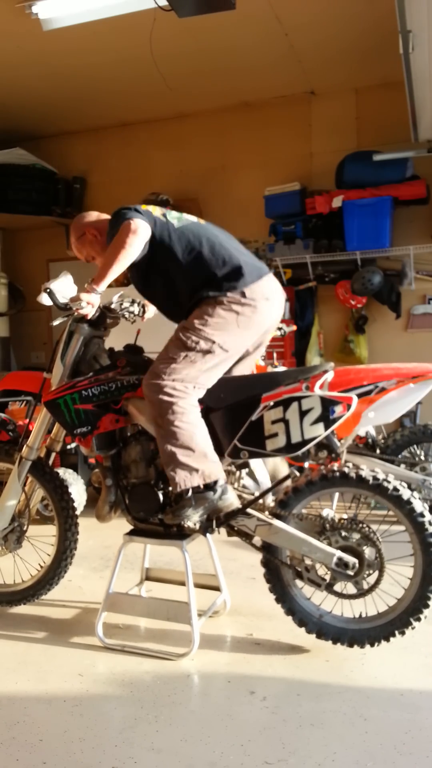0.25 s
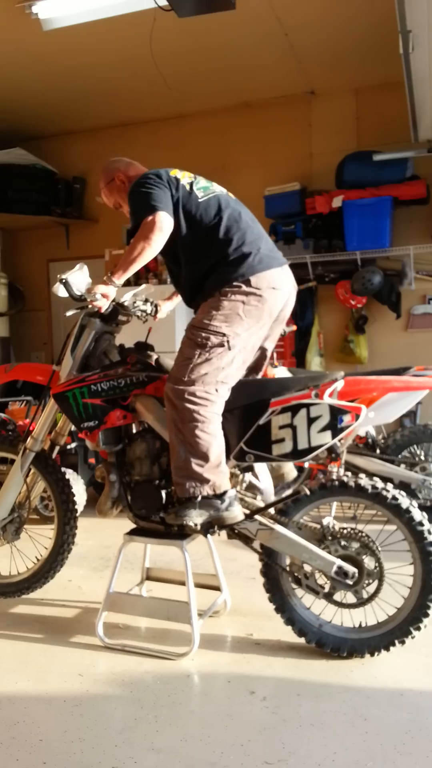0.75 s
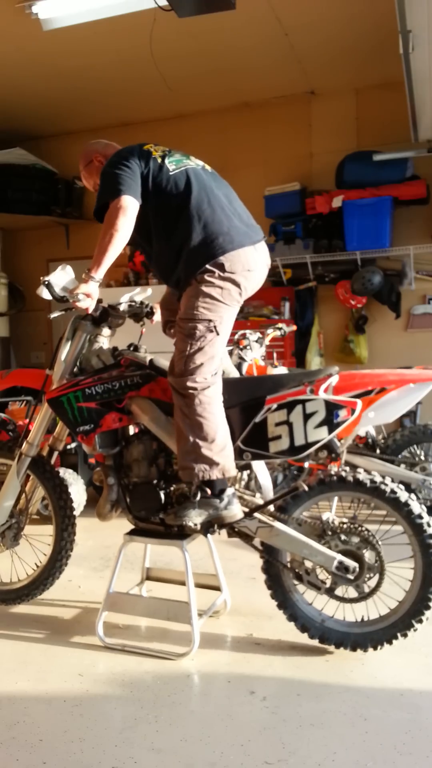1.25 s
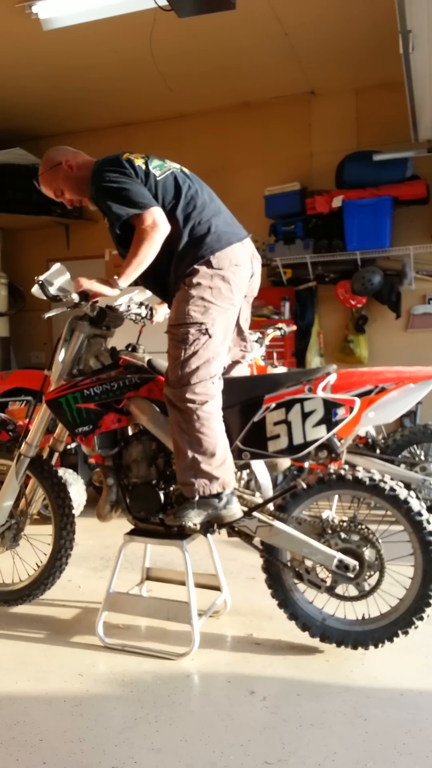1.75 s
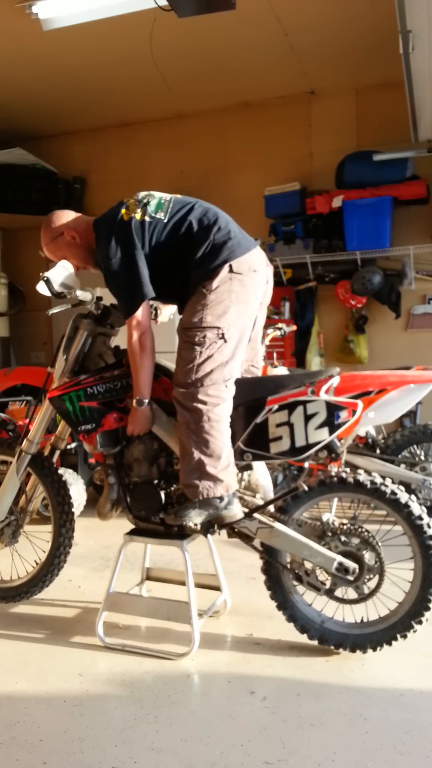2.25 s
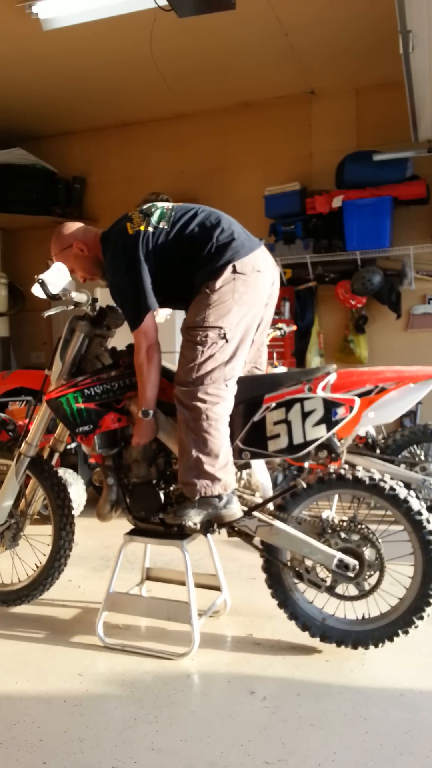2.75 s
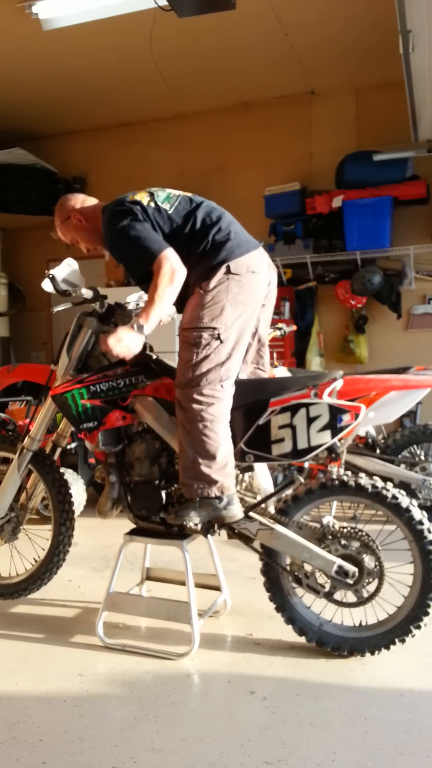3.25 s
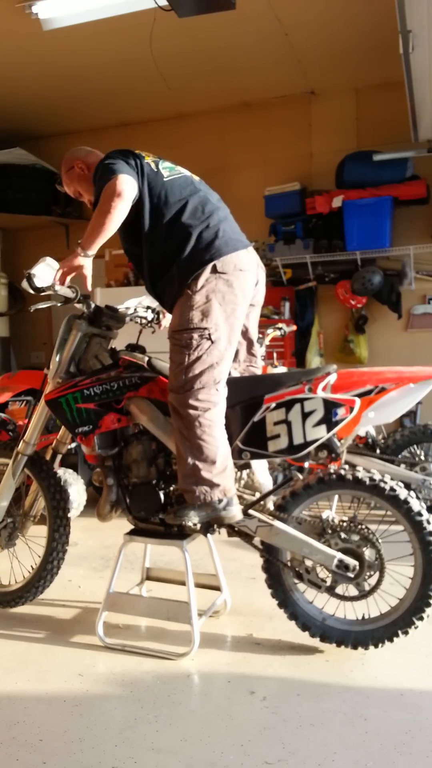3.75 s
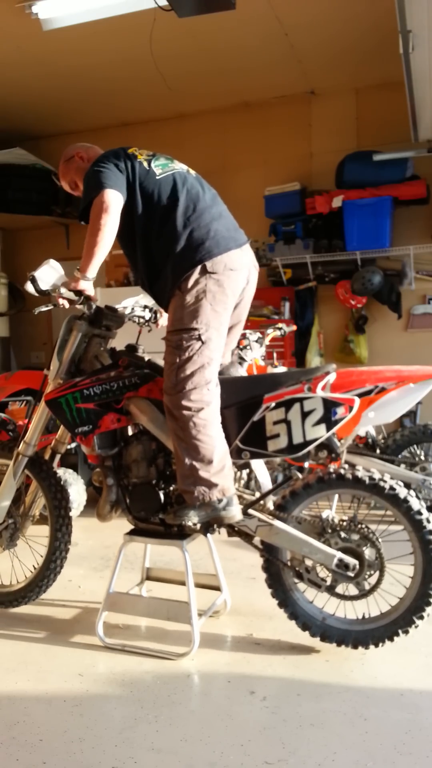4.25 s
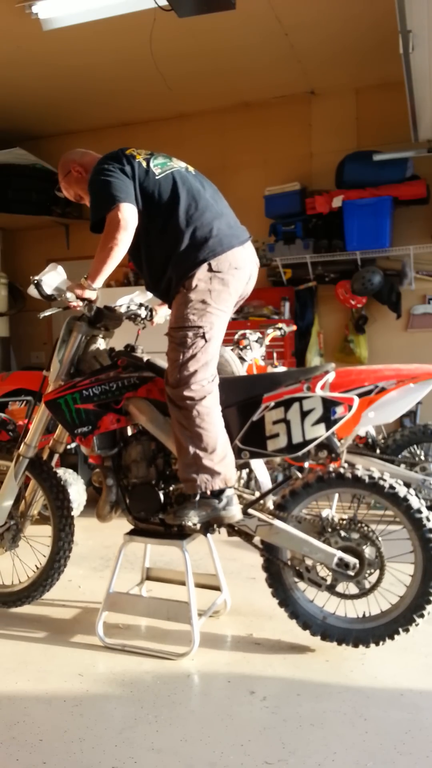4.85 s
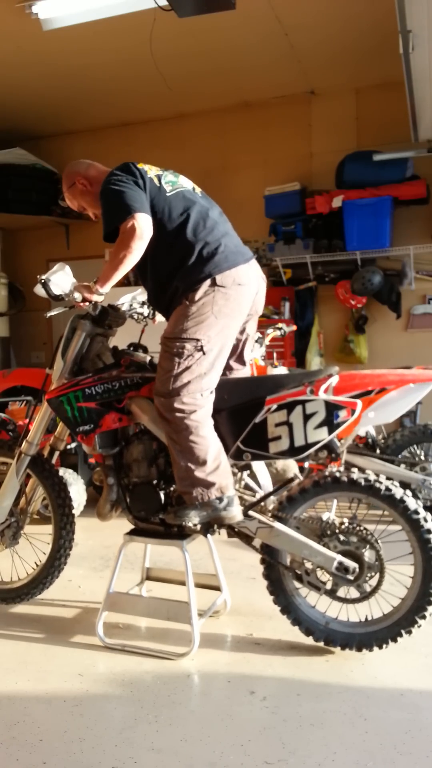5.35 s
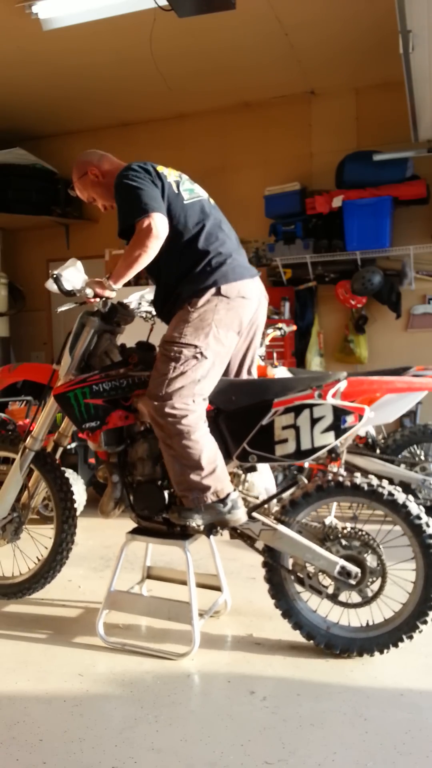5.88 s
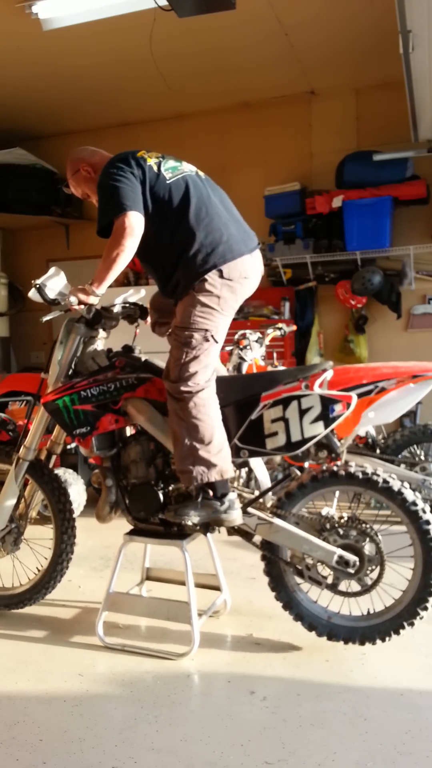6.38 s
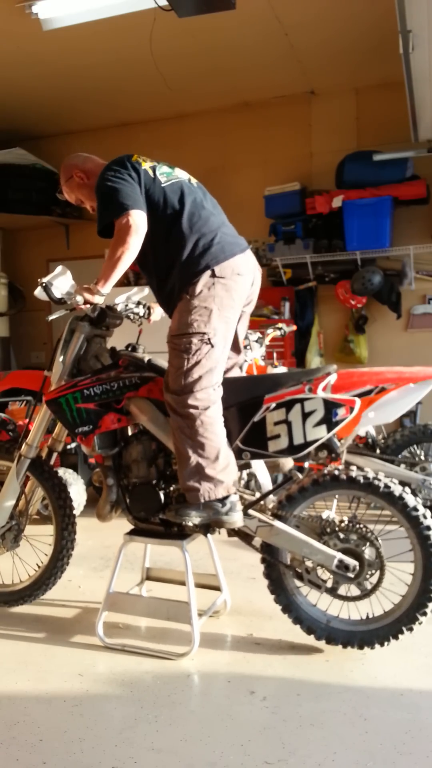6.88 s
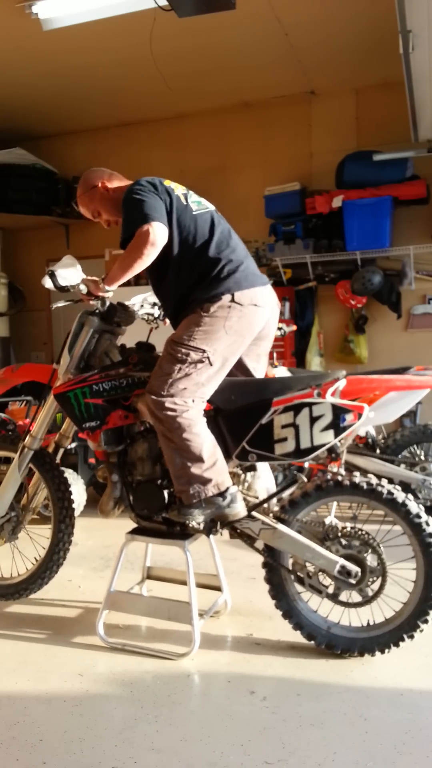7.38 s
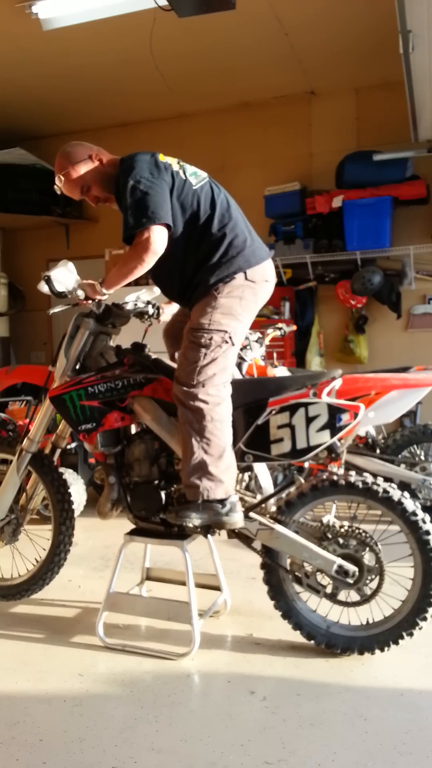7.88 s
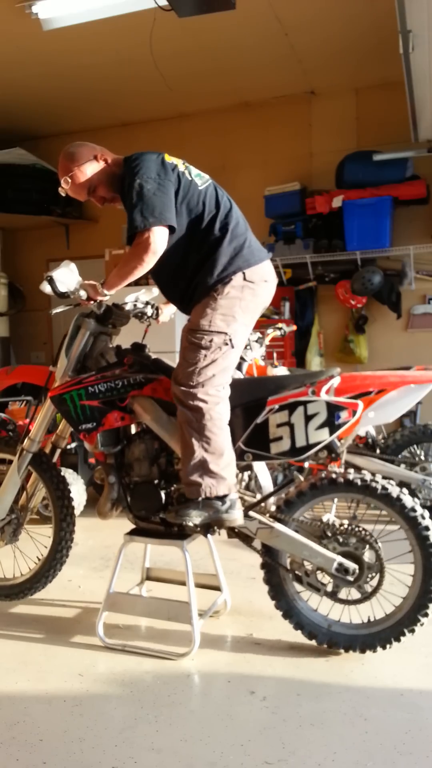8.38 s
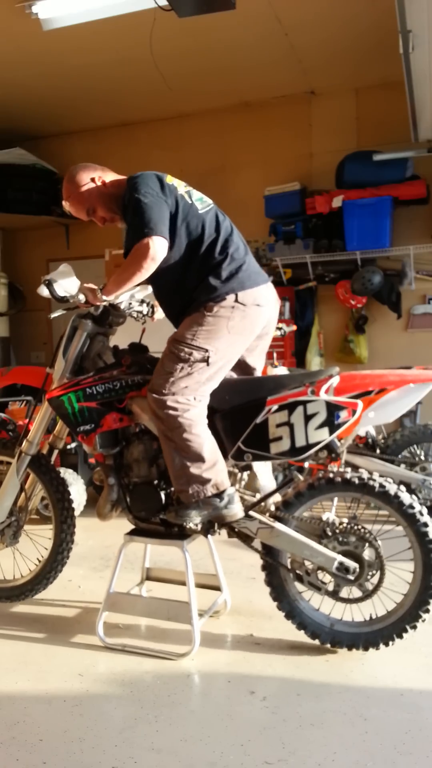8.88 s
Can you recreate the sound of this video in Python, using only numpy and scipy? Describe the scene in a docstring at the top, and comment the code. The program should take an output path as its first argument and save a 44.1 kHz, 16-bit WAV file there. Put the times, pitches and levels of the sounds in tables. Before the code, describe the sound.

In a garage, a kick starter is stamped on a dirt bike propped on a steel stand. A violent cluster of clanks and hollow thuds comes first, then scattered lighter clicks and taps during a quieter fiddling pause. A breathy hiss leads into renewed kicking, with busy clanks, gritty gear rattle, pipe knocks and short whistling air leaks. The engine never fires. Close stereo microphone, short room reverberation, very faint background.

```python
"""A two-stroke dirt bike's kick starter clanks on a steel stand in a garage; the engine never catches.
Blows of lever, ratchet and stand are noise bursts with ringing steel; the starter gears rattle as gritty noise.
Air breathes through the pipe's resonances amid hollow knocks and puffs and low thumps, all decaying tones.
Air hisses out as noise with a whistling band; the pivot chirps once as a stack of overtones.
The garage answers with decaying noise tails over a faint floor; two spaced microphone ports listen."""
import sys
import numpy as np
from scipy import signal
from scipy.fft import rfft, irfft, next_fast_len
from scipy.io import wavfile
from scipy.ndimage import uniform_filter1d, minimum_filter1d, map_coordinates

SR = 44100
rng = np.random.default_rng(int(sys.argv[2]) if len(sys.argv) > 2 else 0)


def dump_mix(stems):
    """Bounce the given channels to the path in sys.argv[1] as a 16-bit WAV at rate SR."""
    frames = np.atleast_2d(stems).T  # one column per channel
    limited = np.clip(frames, -1, 1)  # hard clip at full scale
    pcm = np.round(limited * 32767).astype(np.int16)
    wavfile.write(sys.argv[1], SR, pcm)


N = 402633
TIME = np.arange(N) / SR  # s
CURVE_STEP = 64  # samples between the points of a spell's gain curve


def amp(db):
    """dB to gain."""
    return 10 ** (np.asarray(db) / 20)


def unit(x):
    """Scale to rms 1."""
    return x / np.sqrt(np.mean(x ** 2) + 1e-20)


def along(points, hz):
    """Read (f/Hz, value) points on a log frequency axis."""
    f, value = np.transpose(points)
    return np.interp(np.log(hz + 1), np.log(f + 1), value)


def curves(rows):
    """One value per sample for each column after the time."""
    s, *columns = np.transpose(rows)
    return [np.interp(TIME, s, column) for column in columns]


def wobble(rate):
    """A smooth random curve with rate knots a second."""
    knots = rng.standard_normal(int(N * rate / SR) + 4)
    return map_coordinates(knots, [TIME * rate])


def filtered(x, response):
    """x times a complex response of frequency."""
    n = x.shape[-1]
    padded = next_fast_len(n + SR // 4)
    spectrum = rfft(x, padded) * response(np.fft.rfftfreq(padded, 1 / SR))
    return irfft(spectrum, padded)[..., :n]


def coloured(x, spectrum):
    """Causal filter with the given spectrum, falling steeply below it, that keeps the power of white noise."""
    size = 2 ** 12
    lowest_hz, lowest_db = spectrum[0]
    skirt = [(lowest_hz / 3, lowest_db - 40)]
    gain = amp(along(skirt + spectrum, np.fft.rfftfreq(size, 1 / SR)))
    # folding the cepstrum onto positive times makes the filter minimum-phase
    cepstrum = irfft(np.log(gain + 1e-4))
    cepstrum[1:size // 2] *= 2
    cepstrum[size // 2 + 1:] = 0
    impulse = irfft(np.exp(rfft(cepstrum)))
    return signal.fftconvolve(x, impulse / np.linalg.norm(impulse))[:N]


def resonant(x, modes):
    """x through parallel (f/Hz, width/Hz, level/dB) resonances of alternating sign."""
    def response(f):
        total = 0
        for k, (centre, width, db) in enumerate(modes):
            damping = 1j * f * width
            total = total + (-1) ** k * amp(db) * damping / (centre * centre - f * f + damping)
        return total
    return filtered(x, response)


def gritty(rate, spread_db, grit):
    """Steady noise mixed with sparse bursts, rate a second; grit is the bursts' share of the power."""
    sizes = amp(spread_db * np.minimum(rng.exponential(size=N), 3.5))
    ticks = (rng.random(N) < rate / SR) * sizes
    burst_decay = amp(-60 * TIME[:SR // 20] / 0.015)
    bursts = signal.fftconvolve(ticks, burst_decay)[:N] * rng.standard_normal(N)
    grit = np.clip(grit, 0, 1)
    return np.sqrt(grit) * unit(bursts) + np.sqrt(1 - grit) * rng.standard_normal(N)


def spells(rows, rise_s, fall_db_per_s):
    """Each row swells, slides from its first to its last level, then dies away; one gain curve per row."""
    start, length, first_db, last_db = np.transpose(rows)[:4, :, None]
    t = TIME[::CURVE_STEP] - start
    slide = (last_db - first_db) * np.clip(t / length, 0, 1)
    fall = fall_db_per_s * np.maximum(t - length, 0)
    return amp(first_db + slide - fall) * np.clip(1 + t / rise_s, 0, 1) ** 2


def summed(gains, rest_db):
    """Gain curves add as powers over a resting level."""
    power = (gains ** 2).sum(axis=0) + amp(2 * rest_db)
    return np.interp(TIME, TIME[::CURVE_STEP], np.sqrt(power))


# likeness of left and right in diffuse sound: (f/Hz, correlation)
LIKENESS = [(30, .88), (80, .93), (200, .85), (400, .75), (900, -.05), (2400, .1), (6000, .01),
            (15000, -.17)]


def pair(noise):
    """Two noises become left and right, alike in the bass and nearly unrelated in the treble."""
    def shares(hz):
        angle = np.arccos(np.clip(along(LIKENESS, hz), -1, 1)) / 2
        return np.array([np.cos(angle), np.sin(angle)])
    mid, side = filtered(noise, shares)
    return np.array([mid + side, mid - side])


# spectrum of the faint floor: (f/Hz, relative level/dB)
FLOOR_COLOUR = [(15, -35), (25, 7), (132, 10), (349, -11), (613, -2), (803, -3.5), (3160, -15), (4370, -5),
                (13500, -7), (15500, -66.5)]
FLOOR_DB = -62  # level ahead of the ports


def quiet_floor():
    """Steady coloured noise lies under everything in both ports."""
    noises = [coloured(noise, FLOOR_COLOUR) for noise in rng.standard_normal((2, N))]
    return amp(FLOOR_DB) * pair(np.array(noises))


# clanks of lever, ratchet and stand; knock and brightness relative to the body, levels before the mix:
# (t/s, level/dB, knock/dB, brightness/dB, t60/s)
BLOWS = [(.004, -13.5, -5, -12.5, 0.053), (.3232, -23, -5, 1, 0.059), (0.3545, -6, -2, -9, 0.061),
         (0.4136, -9.5, -8, -8.5, 0.086), (.4566, -9, -3.5, -34, 0.073), (0.5004, -2, -5, -20, 0.026),
         (0.7681, -15.5, -2, -31, 0.046), (0.8389, -20, -4, -28, 0.055), (0.8885, -12.5, -17.5, -4, 0.085),
         (1.2405, -33.5, 4.5, -35, .089), (1.2937, -11, -22, -7.5, 0.084), (1.3934, -17, -15, -29, 0.052),
         (1.6568, -41.5, 2, -6.5, 0.6), (1.787, -30, 0.5, -37, 0.053), (1.9036, -21, -13, -39, 0.046),
         (2.059, -39, 5.5, -21, 0.028), (2.2403, -13.5, -10, -9, 0.054), (2.4251, -15.5, -19, -4, 0.051),
         (2.704, -25, -15, -9, 0.12), (2.932, -41.5, -4, -22, 0.3), (2.9714, -22, -21, -29, 0.34),
         (3.261, -33, -15, -8, 0.069), (3.3132, -19, -21, -10, 0.082), (3.3406, -10, -16, -9.5, .047),
         (3.443, -10, -18, -4, 0.042), (3.624, -29, -6, -22, 0.095), (3.646, -14.5, -23, -7, .11),
         (3.84, -28, -13, -7, 0.054), (4.1663, -21, -24, -8, 0.077), (4.1934, -22, -16, -5, 0.16),
         (4.6391, -20, -14.5, -15, 0.046), (4.777, -21, 2, -40, 0.033), (4.9484, -31.5, 12.5, -38, 0.035),
         (5.5031, -8.5, -14.5, -21, 0.041), (5.6738, -10, -0.5, -25, .04), (5.7491, -13, -7, -27, .093),
         (5.7996, -18, -29, -8, 0.41), (5.916, -16.5, -3, -8, 0.082), (5.9937, -25.5, -12, -14.5, 0.6),
         (6.1238, -17, -8.5, -9, 0.089), (6.2098, -18.5, -13, -5.5, 0.12), (6.3764, -24.5, -2, -33, 0.17),
         (6.572, -16.5, 2.5, -41.5, 0.024), (6.7007, -25.5, -13, 4, 0.093), (6.8005, -16.5, -5.5, 1, 0.06),
         (6.935, -26.5, 4.5, -20, 0.072), (7.0751, -20.5, 3.5, -28, 0.034), (7.3654, -13, -8.5, -4, 0.058),
         (7.5393, -8.5, -12, -7.5, 0.057), (7.658, -15, -8.5, -4, 0.043), (7.7572, -20, -7, -10, 0.18),
         (7.8306, -12, -14, -18, 0.035), (7.874, -15, -15, -12, 0.046), (7.9175, -15, -34, -11, 0.04),
         (8.2536, -16, -1.5, -20, 0.12), (8.3433, -17.5, 1, -34, 0.054), (8.451, -11.5, -10.5, -9, 0.05),
         (8.4896, -10, -17, -5.5, 0.043), (8.556, -21.5, -12, -1, 0.062), (8.6084, -22.5, -16, -14.5, 0.12),
         (9.0483, -7.5, -8, -25, 0.052), (9.075, -8, -12.5, -18, 0.055)]
# spectra of metal noise, duller knock and bright fizz: (f/Hz, relative level/dB)
METAL_COLOUR = [(710, -35), (1200, -10), (1400, -13.5), (1890, -3.5), (2560, -5.5), (3140, -1.5),
                (3620, -3), (4430, 3), (5760, -0.5), (7170, 0.5), (9000, -19), (11700, -23), (19800, -120)]
KNOCK_COLOUR = [(180, -18), (300, -4), (687, -6), (833, -6), (1110, -2), (1370, -7.5), (1530, -2),
                (3000, -9), (3900, -63), (6600, -120)]
FIZZ_COLOUR = [(3530, -25), (6000, 12), (7170, 15.5), (13900, 1.5), (15000, -17), (15500, -103)]
# resonances of lever and stand: (f/Hz, width/Hz, level/dB)
STEEL_MODES = [(2124, 87, 6.5), (3000, 260, -4), (3070, 50, -7), (3344, 120, 11.5), (4050, 46, -22),
               (4970, 114, -8.5), (5220, 87, 13.5), (5604, 23.5, -6), (5960, 273, 14), (7030, 24, -45),
               (6830, 21.5, -16.5), (7200, 77, -14)]
CLANK_RISE_S = 0.0015
SCRAPE_DB, SCRAPE_T60_S = -17.5, 0.051  # the parts graze just before each blow


def clanks():
    """Each contact is a blow and a shudder: metal noise, a duller knock, fizz and the ring of the steel."""
    force, ring = np.zeros((3, N + SR)), np.zeros(N + SR)
    t = TIME[:SR // 3]
    onset = 1 - np.exp(-(t + 1 / SR) / CLANK_RISE_S)
    for s, db, knock_db, bright_db, t60 in BLOWS:
        at = round(s * SR)
        shudder = onset * amp(db - 60 * t / max(t60, .01))
        blow = amp(db - 3.5 - 60 * t / 0.014)
        burst = (shudder + blow) * rng.standard_normal((3, len(t)))
        force[:, at:at + len(t)] += burst * amp([[0], [knock_db], [bright_db]])
        # reversed decay: the graze grows up to the blow
        graze = amp(db + SCRAPE_DB - 60 * t[:min(at, 2000)][::-1] / SCRAPE_T60_S)
        force[0, at - len(graze):at] += graze * rng.standard_normal(len(graze))
        for hz, width, level in STEEL_MODES:
            pitch = hz * rng.normal(1, 0.014)
            tone = np.sin(2 * np.pi * pitch * t) * np.exp(-np.pi * abs(width) * t)
            ring[at:at + len(t)] += amp(db + level - 17.0 + rng.normal(0, 1.72)) * onset * tone
    colours = (METAL_COLOUR, KNOCK_COLOUR, FIZZ_COLOUR)
    noise = sum(coloured(f, colour) for f, colour in zip(force, colours))
    return amp(-1.0) * noise + ring[:N]


# how long the garage holds each frequency: (f/Hz, t60/s)
GARAGE_T60 = [(100, 0.43), (400, 0.47), (1000, 0.43), (3000, 0.4), (7000, 0.35), (14000, 0.2)]


def garage(x, size=SR // 3):
    """Each frequency dies at its own speed; the parts sound from shifting places, so the answer keeps changing."""
    hop = size // 2
    out, x = np.zeros((2, N + 2 * SR)), np.pad(x, (hop, size))
    fade = np.sin(np.pi * np.arange(size) / size)  # overlapping pieces keep their summed power
    for at in range(0, N + hop, hop):
        hz, t, z = signal.stft(rng.standard_normal((2, SR // 2)), SR, nperseg=256)
        decay = amp(-60 * t / along(GARAGE_T60, hz)[:, None])
        tail = pair(signal.istft(z * decay, SR, nperseg=256)[1])
        tail *= 1 - np.exp(-TIME[:tail.shape[1]] / 0.0011)  # a soft start to the answer
        tail /= np.linalg.norm(tail[0])
        wet = signal.fftconvolve(fade * x[None, at:at + size], tail, axes=1)
        out[:, at:at + wet.shape[1]] += wet
    return out[:, hop:][:, :N]


# spells of rattle as the lever travels, brightness relative to the rattle, levels before the mix:
# (t/s, length/s, first level/dB, last level/dB, brightness/dB)
RATTLES = [(0.431, .18, -18, -17, -27), (0.787, 0.059, -17.5, -11.5, -10.5), (0.939, 0.19, -22, -20, -8),
           (1.683, 0.35, -37.5, -43, -10), (2.955, 0.15, -28, -21, -4), (3.62, 0.067, -31, -29, -10),
           (.12, 0.21, -46, -48, -3.5), (2.08, 0.17, -53, -58, -8), (3.9, 0.19, -48, -42, -7),
           (4.42, 0.35, -48, -50, -4), (4.658, 0.215, -57, -35.5, -23), (5.015, 0.53, -30, -29, 1.5),
           (5.673, 0.21, -14, -19, -5.5), (5.98, 0.35, -23, -28.5, -10.5), (6.377, 0.064, -31, -27, -23),
           (6.588, 0.085, -28, -27, -32), (6.763, .07, -33, -24, 1), (6.874, 0.039, -18.5, -27.5, 1),
           (6.992, 0.034, -37, -23, 0.5), (7.104, 0.07, -20.5, -22.5, -3), (7.277, 0.06, -10, -17.5, -4),
           (7.464, .05, -19, -18, -2), (7.562, 0.038, -25, -26, 1), (7.61, 0.46, -28.5, -20.5, -28),
           (8.26, 0.21, -47, -28, -4), (8.446, 0.3, -24.5, -30, -4.5), (8.737, 0.15, -19, -26.5, 1),
           (8.965, .18, -24, -24, -0.5)]
GEAR_RISE_S, GEAR_FALL_DB_PER_S, GEAR_REST_DB = 0.024, 425, -61


def gears():
    """Loose teeth and the return spring chatter against the cases: gritty noise through metal and fizz."""
    gains = spells(RATTLES, GEAR_RISE_S, GEAR_FALL_DB_PER_S)
    bright = gains * amp([row[-1:] for row in RATTLES])
    teeth = gritty(rate=220, spread_db=6.5, grit=0.63) * amp(2.6 * wobble(40))
    metal = unit(coloured(teeth, METAL_COLOUR)) + 0.14 * unit(resonant(teeth, STEEL_MODES))
    fizz = unit(coloured(teeth, FIZZ_COLOUR))
    rattle = summed(gains, GEAR_REST_DB) * unit(metal)
    return amp(-6) * (rattle + summed(bright, GEAR_REST_DB - 4) * fizz)


# spells of air moving in the pipe as the crank turns, levels before the mix:
# (t/s, length/s, first breath level/dB, last breath level/dB, first rumble level/dB)
BREATHS = [(0.316, 0.3, -24.5, -27, -32.5), (0.703, 0.43, -35.5, -34.5, -57.5),
           (1.45, 0.059, -42.5, -36.5, -59), (1.86, 0.56, -43.5, -50.5, -57),
           (3.175, 0.048, -42, -35.5, -60), (3.51, 0.3, -44, -46.5, -62), (4.686, 0.36, -42, -45.5, -49),
           (5.385, 0.081, -28, -31.5, -80), (5.575, 0.33, -32.5, -29, -43.5), (5.96, 0.55, -42.5, -36, -57),
           (6.613, 0.11, -39, -31, -51), (6.964, 0.24, -33, -33.5, -44.5), (7.298, 0.41, -29, -33.5, -44.5),
           (7.787, 0.35, -43, -33, -58), (8.535, 0.23, -36, -26.5, -43), (9.024, 0.13, -23.5, -35, -43)]
# resonances of the pipe: (f/Hz, width/Hz, level/dB)
BORE_MODES = [(338.6, 76, 0.5), (388.8, 93, -1.5), (468.3, 18.4, 0.5), (694.6, 50, 0), (1125, 580, -9.5)]
# spectrum of the low rumble: (f/Hz, relative level/dB)
RUMBLE_COLOUR = [(15, -39), (25, -15.5), (102, -7), (135, -1.5), (161, -2.5), (172, 3), (189, -5.5),
                 (215, 5.5), (236, -2.5), (258, 0), (280, 1), (360, -48), (620, -120)]
# hollow knocks and puffs, low to middling in pitch, levels before the mix: (t/s, level/dB, f/Hz)
HOLLOW_KNOCKS = [(0.323, -21, 190), (.354, -5, 685), (0.408, -9, 438), (.493, -1, 374), (.529, -12, 315),
                 (.559, -13, 160), (.589, -16.5, 428), (0.62, -19, 212), (.838, -16, 675),
                 (1.23, -21.5, 711), (1.485, -30, 890), (1.67, -31, 916), (1.765, -22, 690),
                 (2.041, -26, 466), (2.269, -29, 402), (3.191, -19.5, 1131), (3.339, -18, 740),
                 (3.541, -26.5, 348), (3.653, -28, 380), (4.689, -26, 376), (4.778, -16, 398),
                 (4.815, -24, 367), (5.068, -24, 321), (5.403, -19.5, 713), (5.595, -20.5, 338),
                 (5.673, -13, 1167), (5.799, -13, 340), (5.914, -8, 355), (5.969, -14, 369),
                 (6.019, -32, 330), (6.059, -22, 673), (6.18, -15.5, 382), (6.21, -25, 366),
                 (6.342, -19, 377), (6.378, -16, 660), (6.662, -16.5, 658), (6.713, -19.5, 357),
                 (6.935, -21, 938), (7.051, -22, 340), (7.148, -15, 340), (7.362, -8.5, 362),
                 (7.455, -20, 402), (7.752, -22, 703), (8.052, -13.5, 675), (8.254, -13.5, 990),
                 (8.559, -13.5, 372), (8.779, -12.5, 331), (9.049, -16, 775)]
# low thumps through frame and pipe, levels before the mix: (t/s, level/dB, f/Hz, swell/s)
LOW_THUMPS = [(0.31, -17, 88.4, 0.026), (0.456, -19.5, 86, 0.017), (2.263, -34.5, 183, 0.03),
              (5.564, -28, 89.3, 0.028), (5.915, -41, 59, 0.022), (6.143, -37, 75.5, 0.0172),
              (7.019, -23, 83.5, 0.02), (8.62, -33, 89.1, 0.038)]
PIPE_RISE_S, PIPE_FALL_DB_PER_S, BREATH_REST_DB, RUMBLE_REST_DB = 0.031, 246, -58.5, -64.5
HOLLOW_T60_S, HOLLOW_CYCLES = .07, 12.5  # ring time: a fixed part plus so many cycles of the pitch


def pipe_and_frame():
    """Lumpy air breathes through the pipe's resonances; hollow knocks and puffs and low thumps stand out."""
    gains = spells(BREATHS, PIPE_RISE_S, PIPE_FALL_DB_PER_S)
    rumble_gains = gains * amp([[row[-1] - row[2]] for row in BREATHS])
    lumps = gritty(rate=97, spread_db=6.0, grit=0.38)
    breath = amp(-2.5) * summed(gains, BREATH_REST_DB) * unit(resonant(lumps, BORE_MODES))
    rumble = unit(coloured(rng.standard_normal(N), RUMBLE_COLOUR))
    rumble *= summed(rumble_gains, RUMBLE_REST_DB) * amp(3.9 * wobble(13))
    out = np.zeros(N + SR)
    out[:N] = breath + rumble
    t = TIME[:SR // 3]
    for s, db, hz in HOLLOW_KNOCKS:
        decay = amp(db - 60 * t / (HOLLOW_T60_S + HOLLOW_CYCLES / hz))
        envelope = decay * (1 - np.exp(-t / 0.0028))
        # noise in a band around the pitch
        band = filtered(rng.standard_normal(len(t)), lambda f: np.exp(-(np.log(f / hz + 1e-9) / 0.43) ** 2))
        tone = np.sin(2 * np.pi * hz * t)
        out[round(s * SR):][:len(t)] += envelope * (0.59 * tone + 0.33 * unit(band))
    for s, db, hz, swell in LOW_THUMPS:
        u = t / max(swell, .005)
        envelope = u ** 2 * np.exp(1 - u ** 2)  # swells to its peak, then lets go
        out[round(s * SR):][:len(t)] += amp(db) * envelope * np.sin(2 * np.pi * hz * t)
    return out[:N]


# escaping air, one curve a stroke, levels before the mix: (t/s, level/dB, whistle centre f/Hz)
AIR_LEAKS = [
    [(5.0, -52, 7260), (5.038, -25, 6600), (5.15, -34, 6120), (5.252, -16.5, 7100), (5.374, -21, 7850),
     (5.426, -58, 7420), (5.48, -42, 6410)],
    [(6.69, -24, 7050), (6.706, -20.5, 7110), (6.736, -22.5, 6900), (6.844, -30, 6300), (6.906, -19, 7050),
     (7.0, -54, 6500)],
    [(7.15, -15, 6850), (7.17, -22.5, 7200), (7.338, -20.5, 6560), (7.384, -24, 7040), (7.588, -27, 5760),
     (7.642, -51, 6100), (7.66, -32, 6690)],
    [(8.72, -27, 6380), (8.766, -24.5, 6880), (8.93, -19.5, 7650), (9.0, -17.5, 7600), (9.034, -30, 7020),
     (9.056, -47, 6450), (9.13, -34, 6240)],
]
# spectrum of the broad jet: (f/Hz, relative level/dB)
JET_COLOUR = [(880, -26), (1500, -22), (2880, -12), (3750, -12.5), (7010, -4), (11500, -6.5), (13900, -0.5),
              (14900, -18), (15500, -81)]
WHISTLE_DB = 2.5  # band's added gain at its centre, relative to the broad jet


def leaks():
    """Air escaping under compression is a broad noise jet with a whistling band that glides in pitch."""
    out = np.zeros(N)
    for rows in AIR_LEAKS:
        db, centre_hz = curves(rows)
        gate = np.clip(np.minimum(TIME - rows[0][0], rows[-1][0] - TIME) / 0.0047, 0, 1)
        noise = coloured(gritty(rate=330, spread_db=0, grit=0.05), JET_COLOUR)
        hz, t, z = signal.stft(noise, SR, nperseg=256)
        off = (hz[:, None] - np.interp(t, TIME, centre_hz)) / 700
        whistle = amp(WHISTLE_DB) * np.exp(-off ** 2)
        jet = signal.istft(z * (1 + whistle), SR, nperseg=256)[1][:N]
        out += gate * amp(db - 3.5 + 0.7 * wobble(30)) * unit(jet)
    return out


# the lever's pivot chirps once, level before the mix: (t/s, level/dB, f/Hz, t60/s)
PIVOT_CHIRP = (8.557, -20, 1749.5, .16)


def squeak():
    """Stick and slip at a slightly unsteady rate gives a stack of overtones."""
    s, db, hz, t60 = PIVOT_CHIRP
    t = np.maximum(TIME - s, 0)
    phase = 2 * np.pi * np.cumsum(hz * (1 + 0.00608 * wobble(55))) / SR
    stack = sum(amp(level) * np.sin(k * phase) for k, level in enumerate([-5.5, -5, -2, -2], start=1))
    return amp(db - 60 * t / t60) * (1 - np.exp(-t / 0.0014)) * stack


LEFT_LEAD = 0.00012  # s, by which direct sound reaches the left port before the right


def scene():
    """Direct sound reaches the left port first; the air jet is sent stronger to the right; garage and floor join."""
    hits, rattle, jet, low = clanks() + squeak(), gears(), leaks(), pipe_and_frame()

    def lead(hz):
        return np.exp(1j * np.pi * hz * np.array([[LEFT_LEAD], [-LEFT_LEAD]]))
    jet_pair = amp([[-6.5], [-4]]) * jet  # left, right
    direct = filtered(amp(-3) * hits + rattle + amp(-1.5) * low + jet_pair, lead)
    wet = garage(amp(0.5) * hits + amp(1.5) * rattle + amp(5) * jet + amp(-5.5) * low)
    return direct + wet + quiet_floor()


# colour of the two ports: (f/Hz, left over right level/dB)
PORT_COLOUR = [(60, -8), (130, 5), (290, 2.5), (640, 6.5), (1410, 7), (3100, 12), (6820, -1), (15000, -0.5)]
TOP_HZ = 15500  # band limit


def record(dry):
    """The ports differ in colour, a limiter holds loud peaks down, and nothing is kept above the band limit."""
    # each port takes half of the difference
    ports = filtered(dry, lambda hz: amp(along(PORT_COLOUR, hz) / 2 * np.array([[1], [-1]])))
    needed = np.minimum(1, amp(-0.7) / (np.abs(ports).max(axis=0) + 1e-9))
    gain = uniform_filter1d(minimum_filter1d(needed, size=441), size=441)  # 10 ms windows
    return filtered(gain * ports, lambda hz: hz < TOP_HZ)


dry = scene()
out = record(dry)
dump_mix(out)
```